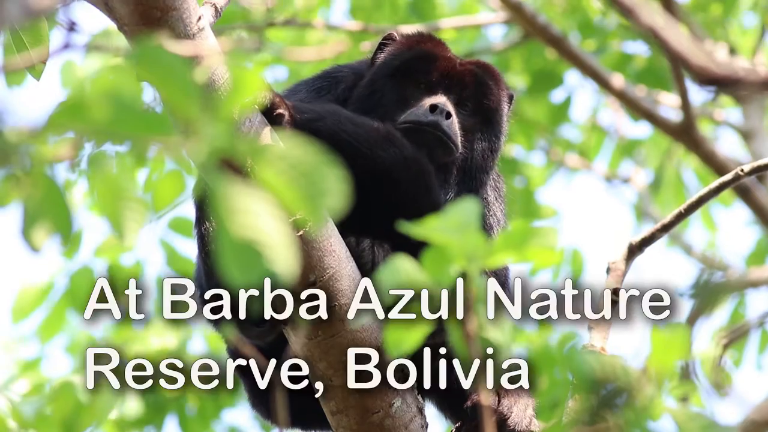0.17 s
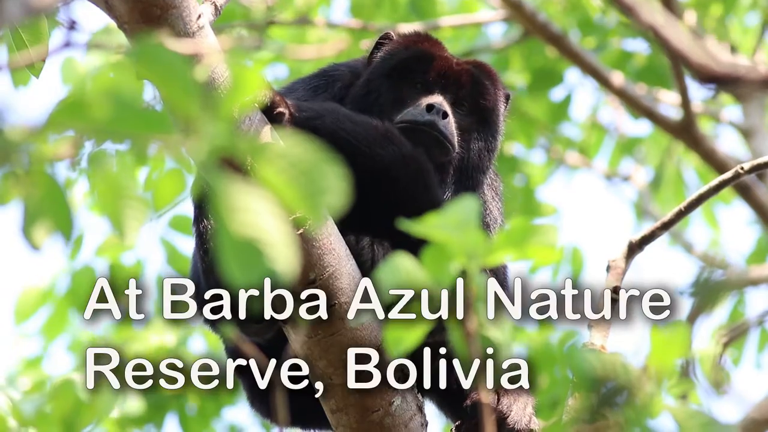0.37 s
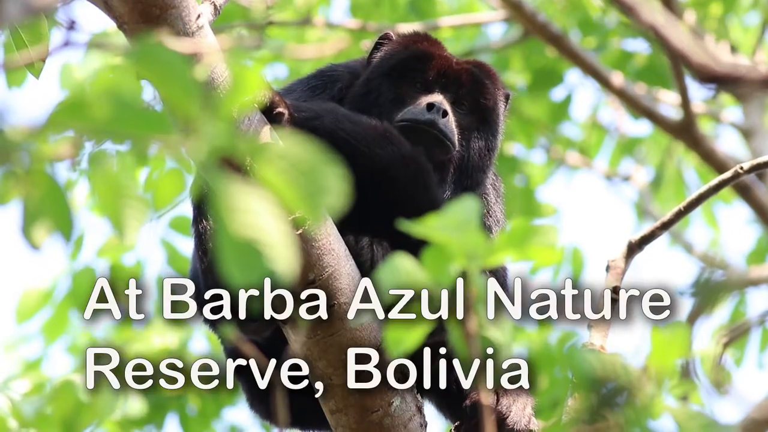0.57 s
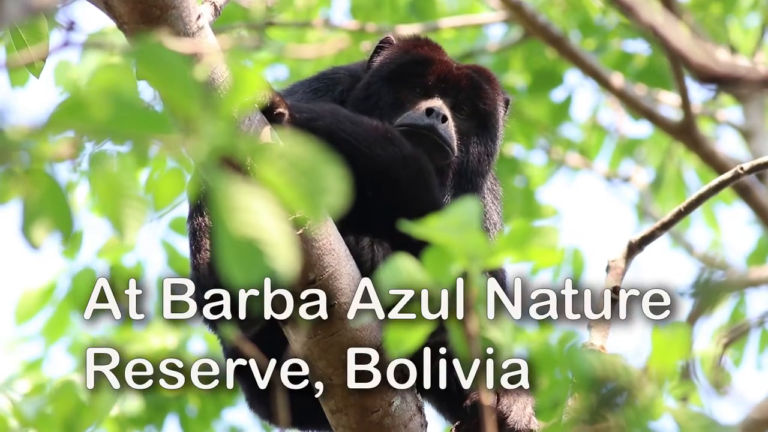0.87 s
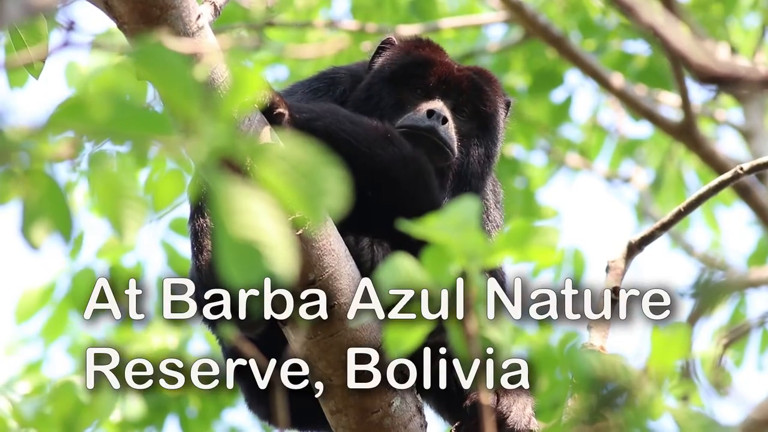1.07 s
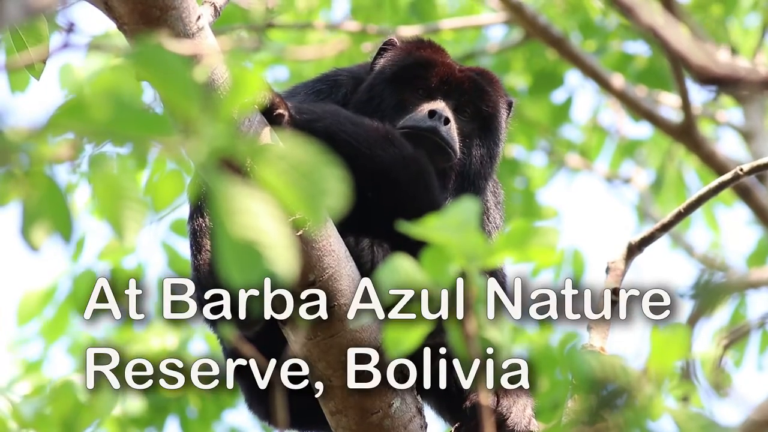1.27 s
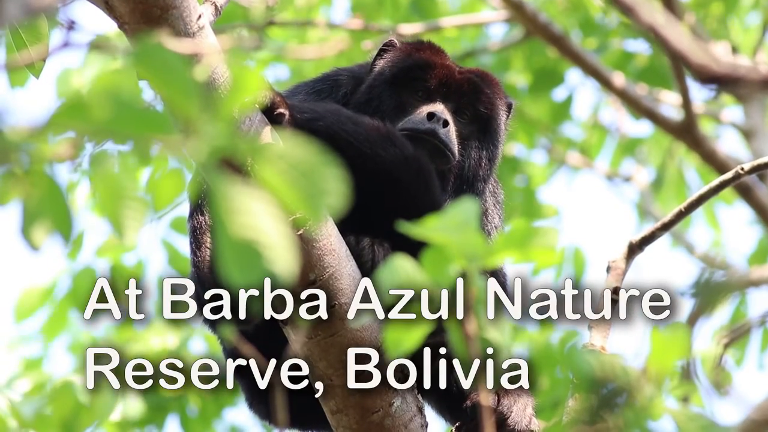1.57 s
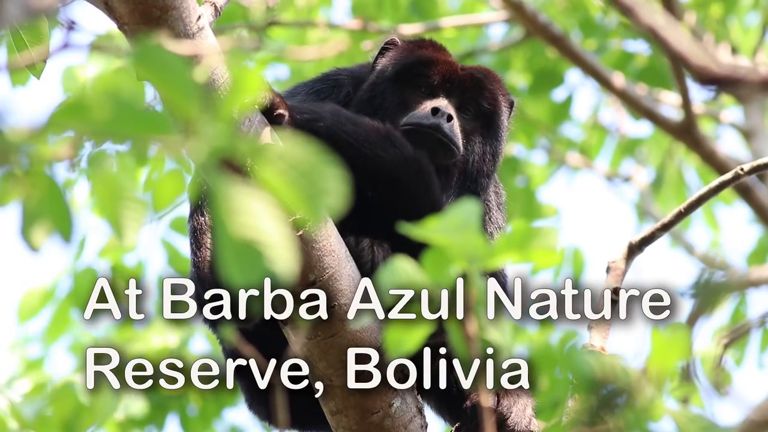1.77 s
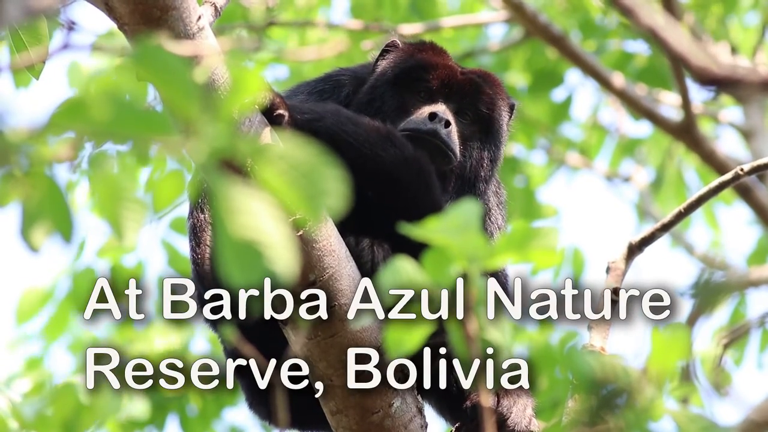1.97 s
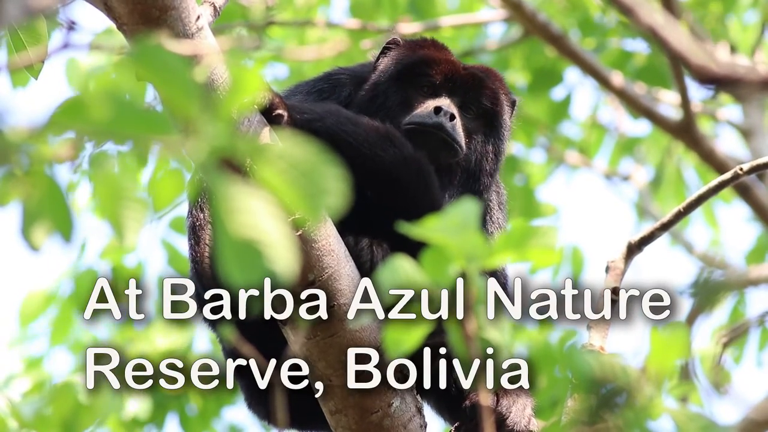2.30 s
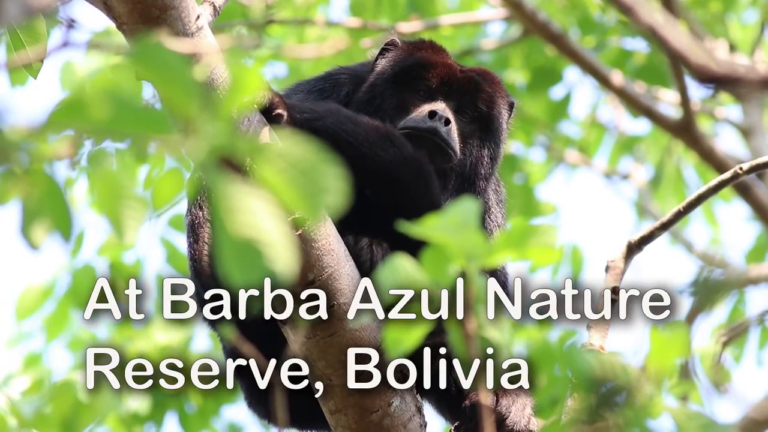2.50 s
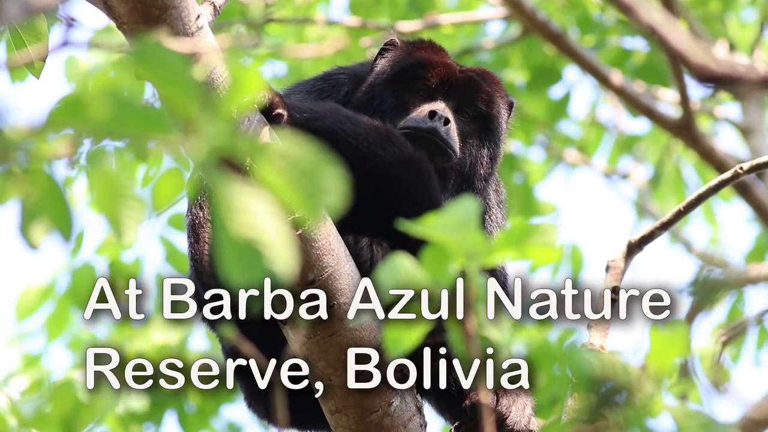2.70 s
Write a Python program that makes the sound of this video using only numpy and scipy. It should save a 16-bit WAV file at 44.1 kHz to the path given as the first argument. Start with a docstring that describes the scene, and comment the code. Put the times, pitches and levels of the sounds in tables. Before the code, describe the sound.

A monkey grunts softly four times, each a throat pop and a short creaky rattle, the first two after faint nasal whistles. Wind buffets the microphone, hardest at first, over a steady forest hush and light leaf rustles.

```python
"""Howler monkey grunting in wind.

A monkey in a tree gives four soft, creaky grunts: one throat pop, then a short slowing rattle of
vocal-fold pulses ringing the throat and hyoid. Thin nasal whistles precede the first two. Wind buffets
the microphone, hardest at first, over an even forest wash and a few leaf rustles. Nearly everything
is in the left channel; the right holds a little crosstalk and preamplifier hiss."""
import sys
import numpy as np
from scipy import signal
from scipy.fft import rfft, irfft
from scipy.io import wavfile
from scipy.ndimage import uniform_filter1d

SR = 44100
rng = np.random.default_rng(int(sys.argv[2]) if len(sys.argv) > 2 else 0)


def to_wav(sig):
    """Store sig (one row per channel, or 1-D mono) as 16-bit WAV at the path in sys.argv[1].

    Samples outside -1..1 are clipped; the rate is SR.
    """
    pcm = np.clip(np.atleast_2d(sig), -1, 1) * 32767
    pcm = np.round(pcm).astype(np.int16)
    wavfile.write(sys.argv[1], SR, pcm.T)  # frames by channels


N = 125685
TIME = np.arange(N) / SR
FOLD_OPEN_S = 0.0038


# Throat pops: (time [s], level [dB], treble [dB])
POPS = [(0.108, -35, -8), (0.657, -40, 1), (1.2183, -33.5, -1.5), (1.8365, -38, -7), (2.3608, -41, 5.5)]
# Grunts: (time [s], level [dB], initial pulse rate [Hz], gap growth [ratio], fade [dB/pulse^2],
# peak treble [dB], treble peak delay [s])
GRUNTS = [(0.724, -31.5, 36.7, 1.37, 2.5, -4.5, .035), (1.259, -31, 36.45, 1.27, 3.5, -0.5, 0.0067),
          (1.888, -30, 40.16, 1.05, 1.45, -2, 0.043), (2.417, -30.5, 40.43, 1.1, 1.7, 0, 0.038)]

def monkey(pulses=4, sink_per_s=0.95, max_dull_db=11.5, bright_s=0.032):
    """Pops from a tight throat, and grunts of a few pulses that slow, sink and fade."""
    out = np.zeros(N)
    for start_s, db, treble_db in POPS:
        add(out, start_s - FOLD_OPEN_S, fold_pulse(db, treble_db, tuning=1.1))
    for start_s, db, rate_hz, gap_growth, fade_db, treble_db, peak_s in GRUNTS:
        age_s = 0
        for k in range(pulses):
            dull_db = max_dull_db * min(((age_s - peak_s) / bright_s) ** 2, 1)
            pulse = fold_pulse(db - fade_db * k ** 2, treble_db - dull_db, tuning=1 - sink_per_s * age_s)
            add(out, start_s + age_s - FOLD_OPEN_S, pulse)
            age_s += gap_growth ** k / rate_hz
    return out


# Throat and hyoid modes: (base frequency [Hz], gain [dB], T60 [s])
THROAT_MODES = [(195.2, 4, 0.039), (427, -15, 0.023), (677, -15.5, .025), (817, -15.5, 0.046)]
# Upper modes, rung at fold closure: (base frequency [Hz], gain [dB], T60 [s])
UPPER_MODES = [(2590, -13.5, 0.032), (2730, -11.5, 0.031), (4180, -12, 0.04), (4400, -15, 0.017),
               (5450, -20, 0.027)]

def fold_pulse(level_db, treble_db, tuning, rasp_s=0.004, size=4096):
    """The vocal folds open gradually and snap shut, with a short rasp of air."""
    t = np.arange(size) / SR
    snap = np.clip((FOLD_OPEN_S - t) * SR / 2, 0, 1)
    push = -t / FOLD_OPEN_S * snap
    rasp = 0.012 * rng.standard_normal(size) * np.exp(-abs(t - FOLD_OPEN_S) / rasp_s) * (t > FOLD_OPEN_S)
    throat = ring(push, THROAT_MODES, tuning)
    upper = ring(push + rasp, UPPER_MODES)
    return amp(level_db) * (throat + amp(treble_db) * upper)


# Nasal whistles: (time [s], length [s], level [dB], pitch [Hz])
WHISTLES = [(0.53, 0.15, -60, 2650), (1.085, 0.1, -59.5, 2760)]

def whistles(jitter_hz=17):
    """Air through the nose sounds one fuzzy tone."""
    out = np.zeros(N)
    for start_s, length_s, db, hz in WHISTLES:
        t = np.arange(0, length_s, 1 / SR)
        cycles = np.cumsum(hz + jitter_hz * drift(rate_hz=150, size=len(t))) / SR
        envelope = np.sqrt(np.sin(np.pi * t / length_s))
        add(out, start_s, amp(db) * envelope * unit(np.sin(2 * np.pi * cycles)))
    return out


def canopy(sound, wet_db=-17.5, t60_s=0.24, delay_s=0.005):
    """Adds faint, short scatter from trunks and leaves."""
    tail = rng.standard_normal(N) * np.exp(-np.log(1000) * TIME / t60_s) * (TIME > delay_s)
    return sound + amp(wet_db) * signal.fftconvolve(sound, tail / np.linalg.norm(tail))[:N]


# Rumble envelope: (time [s], level [dB])
RUMBLE_ENVELOPE = [(0.11, -35), (0.27, -31), (0.44, -34.5), (0.54, -36), (0.7, -37.5), (0.78, -39.5),
                   (0.87, -36.5), (0.96, -37), (1.03, -46.5), (1.14, -33), (1.22, -38.5), (1.32, -45.5),
                   (1.48, -49), (1.62, -46), (1.76, -49.5), (1.9, -45.5), (2.08, -43), (2.2, -44),
                   (2.33, -42), (2.42, -43.5), (2.5, -42), (2.58, -33), (2.65, -53.5), (2.73, -40),
                   (2.85, -44)]
# Rumble spectrum: (frequency [Hz], relative density [dB])
RUMBLE_SPECTRUM = [(8, -11.5), (20, 0), (32, 0), (50, -6.5), (70, -15.5), (100, -24), (150, -35),
                   (300, -49), (800, -69)]
# Eddies hitting the microphone: (peak time [s], length [s], level [dB], low-pass cutoff [Hz])
EDDIES = [(0.174, 0.13, -28, 61), (0.256, 0.051, -30.5, 51), (0.356, 0.083, -26, 102),
          (0.432, 0.076, -28, 77.4), (0.539, 0.054, -39.5, 75), (0.614, 0.063, -23.5, 59),
          (0.818, .05, -35.5, 85), (0.868, 0.057, -27.5, 67), (0.915, 0.04, -43.5, 94),
          (1.14, 0.12, -42.5, 58), (2.079, 0.058, -37, 51)]

def wind(rumble_trim_db=0.5, highpass_hz=33.3):
    """A lumpy rumble on the microphone, with short eddies that reach higher in frequency."""
    rumble_db = np.interp(TIME, *np.transpose(RUMBLE_ENVELOPE)) + rumble_trim_db
    out = amp(rumble_db) * turbulence(spectrum(RUMBLE_SPECTRUM))
    for peak_s, length_s, db, cutoff_hz in EDDIES:
        swell = np.cos(np.pi * np.clip((TIME - peak_s) / length_s, -0.5, 0.5))
        eddy = turbulence(lambda hz: hz ** 2 / (hz ** 2 + highpass_hz ** 2) / (1 + (hz / cutoff_hz) ** 5))
        out += amp(db) * swell * eddy
    return out


def turbulence(shape, evenness=0.59):
    """Turbulent pressure: shaped noise, partly levelled by its running power."""
    pressure = noise(shape)
    power = uniform_filter1d(uniform_filter1d(pressure ** 2, size=1400), size=1400)
    return unit(pressure / power ** (evenness / 2))


# Leaf rustles: (time [s], length [s], level [dB], band centre [Hz], band sigma [oct])
RUSTLES = [(0.159, 0.08, -52.5, 428, 0.82), (0.203, 0.13, -58.5, 3330, 0.96),
           (0.565, 0.16, -62.5, 4500, 1.06), (0.825, 0.056, -63, 4480, 0.84), (1.491, .075, -54, 2300, .55),
           (1.491, 0.068, -57, 4450, .2), (2.047, 0.034, -62, 5500, 0.62), (2.787, 0.099, -56.5, 2950, 1),
           (2.81, .07, -62, 7000, 0.37)]

def leaves(crackle_db=5, skew=0.63):
    """Nearby leaves brush together in short, grainy swishes."""
    out = np.zeros(N)
    for start_s, length_s, db, centre_hz, sigma_oct in RUSTLES:
        progress = np.arange(0, length_s, 1 / SR) / length_s
        size = len(progress)
        swish = noise(lambda hz: np.exp(-(np.log2((hz + 1) / centre_hz) / sigma_oct) ** 2 / 2), size)
        grain = amp(crackle_db * drift(rate_hz=330, size=size))
        envelope = np.sin(np.pi * progress ** skew)
        add(out, start_s, amp(db) * unit(swish * grain * envelope))
    return out


# Forest wash: (frequency [Hz], relative density [dB])
FOREST_SPECTRUM = [(30, 1.5), (130, 0.5), (280, -1), (500, -1.5), (830, 0.5), (1500, -3.5), (2800, -6.5),
                   (4500, -10), (7500, -13), (11000, -18.5), (16000, -30.5)]

def forest(level_db=-52.5, patch_db=1.14, swell_db=0.2):
    """Distant foliage: a smooth wash with slight drifting patches and a faint swell."""
    frames = dict(fs=SR, nperseg=1024, noverlap=768)
    _, _, bins = signal.stft(noise(spectrum(FOREST_SPECTRUM)), **frames)
    patches = uniform_filter1d(rng.standard_normal(bins.shape), size=16, axis=0)  # across frequency
    patches = unit(uniform_filter1d(patches, size=14, axis=1))  # across time
    _, wash = signal.istft(bins * amp(patch_db * patches), **frames)
    return amp(level_db - swell_db * drift(rate_hz=6.3)) * unit(wash[:N])


def amp(db):
    """Decibels to gain."""
    return 10 ** (np.asarray(db) / 20)


def unit(x):
    """Scales to rms 1."""
    return x / np.sqrt(np.mean(x ** 2) + 1e-20)


def spectrum(points):
    """Gain function of a spectrum table, interpolated in log frequency."""
    points_hz, db = np.transpose(points)
    return lambda hz: amp(np.interp(np.log(hz + 1), np.log(points_hz + 1), db))


def add(mix, start_s, sound):
    """Mixes a sound in place."""
    part = mix[max(round(start_s * SR), 0):][:len(sound)]
    part += sound[:len(part)]


def noise(shape, size=N):
    """Noise of rms about 1, with spectral gain shape(hz)."""
    white = rfft(rng.standard_normal(N))
    return unit(irfft(white * shape(np.fft.rfftfreq(N, 1 / SR)), N))[:size]


def drift(rate_hz, size=N):
    """Random movement up to about rate_hz."""
    return noise(lambda hz: np.exp(-(hz / rate_hz) ** 2), size)


def ring(drive, modes, tuning=1, scatter=0.0068):
    """Drives damped modes, each slightly detuned per call."""
    t = np.arange(len(drive)) / SR
    response = 0
    for hz, db, t60_s in modes:
        omega = 2 * np.pi * hz * tuning * (1 + scatter * rng.standard_normal())
        decay = np.exp(-np.log(1000) * t / t60_s)
        response += omega / SR * amp(db) * decay * np.cos(omega * t)
    return signal.fftconvolve(drive, response)[:len(t)]


def scene(left_db=5, right_db=-27.5):
    """One microphone, wired to the left channel, leaking faintly into the right."""
    air = canopy(monkey() + whistles()) + leaves() + forest() + wind()
    return air * amp([[left_db], [right_db]])


# Preamplifier hiss: (frequency [Hz], relative density [dB])
HISS_SPECTRUM = [(20, 9), (300, 2), (1500, 0), (16000, -1)]

def record(dry, hiss_db=-58.5, lead_in_s=0.105, cutoff_hz=15850):
    """Preamplifier hiss in both channels, a silent lead-in and a low-pass."""
    hiss = amp(hiss_db) * np.array([noise(spectrum(HISS_SPECTRUM)) for _ in dry])
    gate = np.clip((TIME - lead_in_s) / 0.002, 0, 1)
    lowpass = signal.firwin(511, cutoff_hz, window=("kaiser", 9), fs=SR)
    return signal.oaconvolve((dry + hiss) * gate, lowpass[None], "same")


dry = scene()
out = record(dry)
to_wav(out)
```